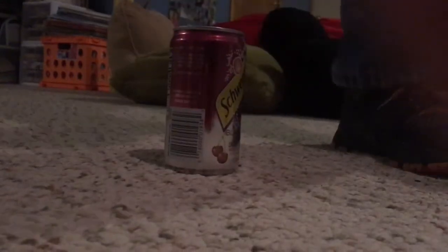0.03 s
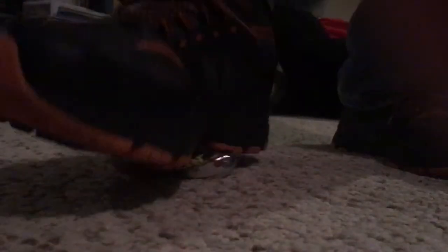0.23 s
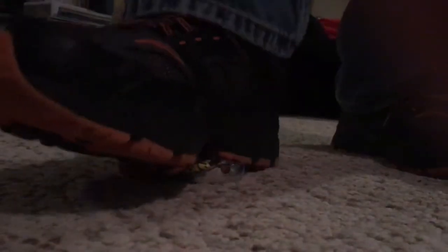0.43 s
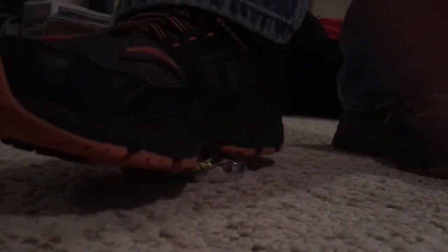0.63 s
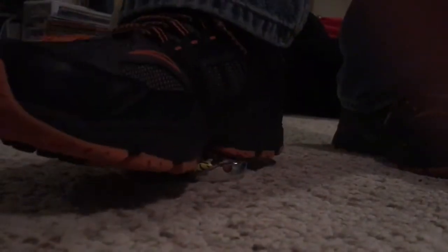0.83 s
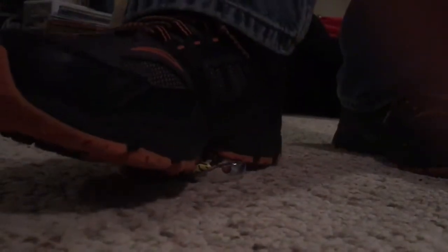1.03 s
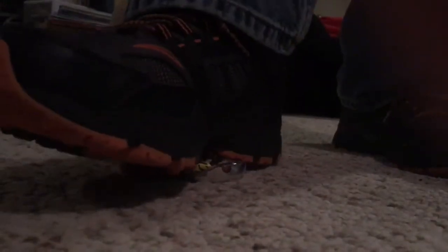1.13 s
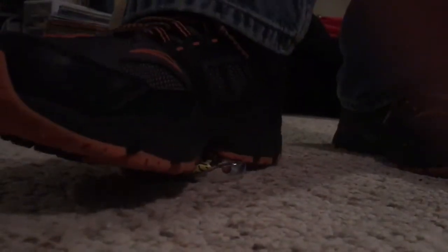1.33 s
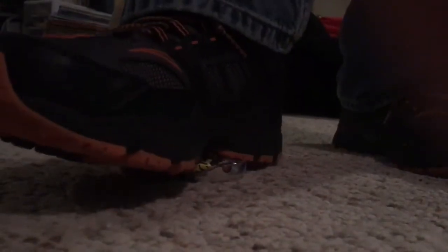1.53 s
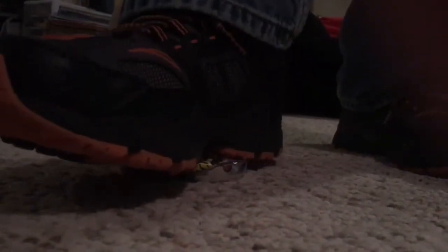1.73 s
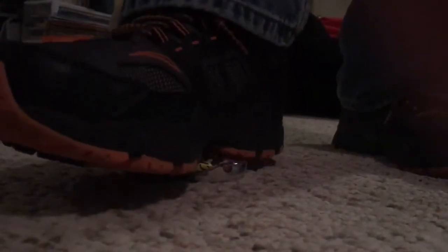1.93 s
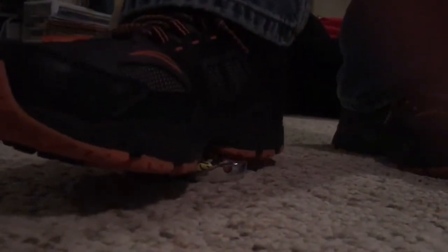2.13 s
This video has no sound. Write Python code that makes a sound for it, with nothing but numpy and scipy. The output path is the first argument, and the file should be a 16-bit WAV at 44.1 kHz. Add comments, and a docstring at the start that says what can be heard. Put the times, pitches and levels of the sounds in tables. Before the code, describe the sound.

An aluminium can stomped flat on carpet with one sharp crunch and a thud.

```python
"""An aluminium can is stomped flat on carpet, close by in a quiet room.
The shoe pushes air ahead of it; the wall ticks, gives way with a hollow pop and folds in a 40 ms
crunch of buckles and creases that rings the can. The heel thuds down and the room rings briefly.
Then the sole scuffs, the flat can creaks faintly and two soft blips sound over low hiss and hum."""
import sys
import numpy as np
from scipy import signal
from scipy.io import wavfile

SR = 44100
rng = np.random.default_rng(int(sys.argv[2]) if len(sys.argv) > 2 else 0)


def generate_wav(signal):
    """Clip the signal to [-1, 1] and save it as 16-bit WAV at the path in sys.argv[1]."""
    frames = np.transpose(np.atleast_2d(signal))
    scaled = np.clip(frames, -1, 1) * 32767
    pcm = np.round(scaled).astype(np.int16)
    wavfile.write(sys.argv[1], SR, pcm)


N = 97020

# background spectra: freq_hz, gain_db
HISS_SPECTRUM = [(20, 5.5), (100, -3), (250, -8), (600, -11.5), (1500, -14), (4000, -14.5), (5000, -15),
                 (5600, -61.5), (16000, -77)]
FIZZ_SPECTRUM = [(2000, -41), (4800, -10.5), (5700, 4.5), (8000, 1), (15500, 3), (16200, -22.5)]
RUMBLE_SPECTRUM = [(10, -22), (30, -6.5), (48, 6), (70, -9.5), (130, -22), (400, -41), (2000, -78.5)]
# background levels over time: time_s, level_db
HISS_ENVELOPE = [(0, -73.5), (.15, -67), (.42, -72), (.55, -72), (.97, -68.5), (1.02, -76), (1.69, -73.5),
                 (1.73, -65.5), (2.2, -67)]
FIZZ_ENVELOPE = [(0, -79.5), (.16, -71), (.42, -79.5), (.47, -74), (.75, -76.5), (.97, -70), (1.0, -80),
                 (1.16, -80), (1.19, -104), (2.2, -104)]
RUMBLE_ENVELOPE = [(0, -73.5), (.4, -80), (.75, -83.5), (.95, -74), (1.1, -71), (1.4, -72), (1.6, -79),
                   (1.75, -73), (2.2, -75)]
HUM_ENVELOPE = [(0, -69), (.7, -78), (.95, -65.5), (1.1, -64), (1.2, -80), (2.2, -80.5)]
# pushed air: time_s, level_db
RUSH_ENVELOPE = [(0, -92), (.12, -86), (.18, -66), (.2, -50), (.215, -40), (.235, -32), (.26, -40),
                 (.30, -51), (.35, -68.5), (.42, -96.5)]
# pushed air: freq_hz, gain_db
RUSH_SPECTRUM = [(20, -24), (55, 0), (100, -1.5), (180, 2.5), (400, -6), (900, -15), (2500, -36.5),
                 (8000, -61)]
# faint creaks, then the small ticks of the two low blips: start_s, pitch_hz, level_db, decay_s
CREAKS_AND_TICKS = [(.171, 1090, -56.5, 0.0034), (.494, 599, -58, 0.0059), (.503, 219.5, -52, 0.0044),
                    (.511, 1308, -62, .003), (.520, 150.1, -54.5, 0.0061), (.662, 515, -59.5, 0.0023),
                    (.689, 452.7, -61, 0.0034), (.760, 431, -50.5, .002), (.935, 237.8, -63, 0.011),
                    (.98, 170, -64.5, .01), (1.1172, 1000, -53.5, .0007), (1.1176, 2498, -56.5, .0005),
                    (1.3160, 399.5, -54, .002), (1.3172, 850, -56, .0015)]
# their grit: freq_hz, gain_db
GRIT_SPECTRUM = [(100, -2.5), (600, 6.5), (1500, -8.5), (4000, -28), (12000, -65)]
# big buckles: start_s, body_db, treble_db, decay_s
WALL_BUCKLES = [(.1925, -60, -56.5, 0.0013), (.2040, -34, -37.5, 0.0014), (0.2066, -43.5, -37, 0.0013),
                (0.2153, -6, -6, .0006), (.2220, -22, -22, 0.002), (.2277, -8, -12.5, 0.0012),
                (.2305, -19.5, -18.5, .0015), (.2385, -21.5, -23, .0015), (.2420, -16, -13.5, 0.0022),
                (0.2444, -17.5, -17, .001), (0.248, -16.5, -20.5, .0016), (.2562, -11.5, -24, 0.0011)]
# fine crumpling: time_s, body_db, treble_db
CRUMPLE_ENVELOPE = [(.19, -90.5, -100), (.206, -68, -54.5), (.214, -46.5, -55), (.217, -27, -32.5),
                    (.226, -24, -35), (.229, -22, -21), (.247, -22.5, -26), (.257, -22.5, -31),
                    (.263, -39, -47.5), (.29, -53, -56), (.32, -77.5, -74.5), (.365, -63.5, -68),
                    (.41, -94.5, -100)]
# folding metal: freq_hz, gain_db
BODY_SPECTRUM = [(60, -32), (250, -6.5), (450, 0), (700, 1), (1100, 0), (1600, -1), (2200, -4.5),
                 (2900, -2.5), (3800, -3), (4600, -14), (8000, -31.5), (16000, -47.5)]
TREBLE_SPECTRUM = [(500, -39), (3000, -13.5), (5200, -4.5), (6300, -0.5), (7700, -5), (9000, 4),
                   (10300, -0.5), (12000, 1.5), (15000, 4), (16500, -6.5)]
# can ringing: pitch_hz, gain_db, t60_s
CAN_MODES = [(400, 3, .11), (473, -4, .1), (573, -6, .09), (647, 2, .07), (842, -4, .08), (972, 1, .06),
             (1033, -2, .06), (1291, 1, .05), (1394, -3, .07), (1740, -4, .05), (2624, 2, .04),
             (2910, -2, .04), (3231, -1, .04), (3722, -2, .04)]
# wall flex, hollow pop, can on floor, rebounds: start_s, pitch_hz, gain_db, rise_s, decay_s
LOW_BLOWS = [(0.2122, 300, -27, .002, .004), (.2172, 279.8, -2.5, 0.00061, .0038),
             (.2163, 690.4, -5, .001, .0025), (.2255, 690, -14, .003, 0.0044),
             (0.2304, 200.2, -17, .001, .005), (0.2367, 172, -14, .001, 0.0071),
             (0.2376, 419.3, -16, .001, .004), (0.2557, 400, -21.5, .001, .004),
             (.282, 75, -36, .003, .014)]
# rim ringing: pitch_hz, level_db, t60_s
RIM_MODES = [(168, -49, .28), (403, -66, .8), (606, -70, 1.1), (925, -65, .7)]
# settling sole: time_s, level_db
SCUFF_ENVELOPE = [(.42, -100), (.48, -72.5), (.50, -58), (.515, -66), (.535, -74.5), (.6, -77.5),
                  (.66, -100)]
# settling sole: freq_hz, gain_db
SCUFF_SPECTRUM = [(40, -10), (120, 2), (400, 0), (900, -3.5), (1800, -12), (3000, -24), (12000, -36)]
# low sweeps: tick_s, length_s (negative: before the tick), level_db, knee_s
BLIP_SWEEPS = [(1.1174, 0.037, -54, 0.0048), (1.317, -0.12, -55.5, 0.015)]
# room decay: freq_hz, t60_s
ROOM_DECAY = [(60, 0.005), (250, 0.2354), (1000, 0.2043), (3000, 0.1843), (8000, 0.19), (16000, 0.11)]
# room tail: freq_hz, gain_db
ROOM_SPECTRUM = [(50, -8), (150, -1), (500, -2.5), (1400, -3.5), (3500, -6), (6000, 1.5), (9000, -1),
                 (15000, -2.5)]


def amp(db):
    """Decibels to gain."""
    return 10 ** (np.asarray(db) / 20)


def unit_rms(x):
    """Scale to rms 1."""
    return x / np.sqrt(np.mean(x ** 2) + 1e-20)


def at_freq(points, freq_hz):
    """Interpolate on a log-frequency axis."""
    knots_hz, values = np.transpose(points)
    return np.interp(np.log(freq_hz + 1), np.log(knots_hz + 1), values)


def envelope(points, column=1):
    """Gain over time from one dB column."""
    rows = np.array(points)
    return amp(np.interp(np.arange(N) / SR, rows[:, 0], rows[:, column]))


def since(start_s):
    """Seconds since start, zero before."""
    return np.maximum(np.arange(N) / SR - start_s, 0)


def colour(x, spectrum, size=4096):
    """Causal unit-energy filter with the given spectrum."""
    freq_hz = abs(np.fft.fftfreq(size, 1 / SR))
    log_gain = np.log(amp(at_freq(spectrum, freq_hz)))
    response = np.exp(np.conj(signal.hilbert(log_gain)))
    taps = np.fft.ifft(response).real[:size // 2]
    return signal.oaconvolve(x, taps / np.linalg.norm(taps))[:N]


def noise(spectrum):
    """Steady coloured noise, rms 1."""
    return unit_rms(colour(rng.standard_normal(N), spectrum))


def background(hum_hz=47.7):
    """Faint hiss, treble fizz, rumble and mains hum, each changing in level; the fizz stops near 1.19 s and the
    hiss rises near 1.7 s."""
    hiss = noise(HISS_SPECTRUM) * envelope(HISS_ENVELOPE)
    fizz = noise(FIZZ_SPECTRUM) * envelope(FIZZ_ENVELOPE)
    rumble = noise(RUMBLE_SPECTRUM) * envelope(RUMBLE_ENVELOPE)
    hum = np.sqrt(2) * envelope(HUM_ENVELOPE) * np.sin(2 * np.pi * hum_hz * since(0))
    return hiss + fizz + rumble + hum


def air_rush():
    """Air pushed ahead of the shoe: a swell of low noise."""
    return noise(RUSH_SPECTRUM) * envelope(RUSH_ENVELOPE)


def creaks_and_ticks():
    """Faint creaks, then the small ticks of the two low blips: damped swings with grit."""
    out = np.zeros(N)
    grit = .46 * noise(GRIT_SPECTRUM)
    for start_s, pitch_hz, level_db, decay_s in CREAKS_AND_TICKS:
        t = since(start_s)
        fade = (t > 0) * np.exp(-t / decay_s)
        out += amp(level_db) * fade * (np.sin(2 * np.pi * pitch_hz * t) + grit)
    return out


def creases(rate_per_s=2200, spread_db=5):
    """Dense train of tiny uneven snaps."""
    sizes = amp(spread_db * np.minimum(rng.exponential(1, N), 3))
    signs = rng.choice([-1., 1.], N)
    hits = rng.random(N) < rate_per_s / SR
    return unit_rms(sizes * signs * hits)


def folding_wall(spectrum, column, click_share):
    """One register of the metal: fine creases plus buckles, each a click and a noise burst."""
    drive = envelope(CRUMPLE_ENVELOPE, column) * creases()
    scatter = rng.choice([-1., 1.], N)
    for buckle in WALL_BUCKLES:
        start_s, gain, decay_s = buckle[0], amp(buckle[column]), buckle[-1]
        t = since(start_s)
        burst = (t > 0) * np.exp(-t / decay_s) * scatter
        drive += gain * np.sqrt(1 - click_share) * burst
        drive[round(start_s * SR)] += gain * np.sqrt(click_share * decay_s * SR / 2)
    return colour(drive, spectrum)


def can_crunch(ring_vs_body_db=-7):
    """The wall folds; the can's modes build up with its energy, then die away."""
    body = folding_wall(BODY_SPECTRUM, column=1, click_share=.4)
    t = np.arange(SR // 2) / SR
    ring = np.zeros(N)
    for pitch_hz, gain_db, t60_s in CAN_MODES:
        energy = signal.oaconvolve(body ** 2, amp(-120 * t / t60_s))[:N]
        tone = np.sin(2 * np.pi * (pitch_hz * since(0) + rng.random()))
        ring += amp(gain_db) * np.sqrt(abs(energy)) * tone
    treble = folding_wall(TREBLE_SPECTRUM, column=2, click_share=.14)
    return body + amp(ring_vs_body_db) * body.std() * unit_rms(ring) + treble


def low_blows():
    """Heavily damped swings of air, can and floor."""
    out = np.zeros(N)
    for start_s, pitch_hz, gain_db, rise_s, decay_s in LOW_BLOWS:
        t = since(start_s)
        swell = (1 - np.exp(-t / rise_s)) * np.exp(-t / decay_s)
        out += amp(gain_db) * swell * np.sin(2 * np.pi * pitch_hz * t)
    return 1.1 * out


def heel_thud(start_s=.2305, level_db=-8.5, rise_s=.0029, decay_s=.013):
    """Deep falling thud: the floor's swing slows as the weight settles."""
    start_hz, end_hz, sag_s = 109, 48, .01
    t = since(start_s)
    cycles = end_hz * t + (start_hz - end_hz) * sag_s * (1 - np.exp(-t / sag_s))
    swell = (1 - np.exp(-t / rise_s)) * np.exp(-t / decay_s)
    return -amp(level_db) * swell * np.sin(2 * np.pi * cycles)


def rim_ring(start_s=.256):
    """The stiff rim rings on faintly once the can is flat."""
    t = since(start_s)
    return sum(amp(level_db - 60 * t / t60_s) * np.sin(2 * np.pi * pitch_hz * t)
               for pitch_hz, level_db, t60_s in RIM_MODES)


def scuff():
    """Dull rub of sole and flat can on carpet."""
    return envelope(SCUFF_ENVELOPE) * unit_rms(colour(creases(), SCUFF_SPECTRUM))


def blips(edge_s=.002):
    """Two soft low sweeps: one falls away from a tick, one rises into a tick."""
    out = np.zeros(N)
    for tick_s, length_s, level_db, knee_s in BLIP_SWEEPS:
        distance_s = np.maximum((np.arange(N) / SR - tick_s) * np.sign(length_s), 0)
        swell = (1 - np.exp(-distance_s / edge_s)) * np.exp(-(distance_s / length_s) ** 4)
        cycles = 1.465 * np.log1p(distance_s / knee_s)
        out += amp(level_db) * swell * np.sin(2 * np.pi * cycles)
    return out


def room(x, level_db=-19, build_s=.0076, size=256):
    """Short diffuse tail of a carpeted room; each band decays at its own rate."""
    freq_hz, t, bands = signal.stft(rng.standard_normal(SR // 2), SR, nperseg=size)
    fade_db = -60 * t / at_freq(ROOM_DECAY, freq_hz)[:, None]
    colour_db = at_freq(ROOM_SPECTRUM, freq_hz)[:, None]
    tail = signal.istft(bands * amp(fade_db + colour_db), SR, nperseg=size)[1]
    tail *= np.minimum(np.arange(len(tail)) / SR / build_s, 1) ** 2
    return amp(level_db) * signal.fftconvolve(x, tail / np.linalg.norm(tail))[:N]


def scene():
    """Stomp and aftermath in the room, plus blips and background; mono."""
    stomp = can_crunch() + rim_ring() + heel_thud() + low_blows()
    direct = stomp + creaks_and_ticks() + air_rush() + scuff()
    return (direct + room(direct) + blips() + background())[None]


def record(dry):
    """Microphone: low cut, soft peak rounding, band limit."""
    low_cut_hz, high_cut_hz, ceiling = 15, 16100, .62
    thinned = signal.lfilter(*signal.butter(2, low_cut_hz, "high", fs=SR), dry)
    rounded = ceiling * np.tanh(thinned / ceiling)
    lowpass = signal.firwin(255, high_cut_hz, window=("kaiser", 9), fs=SR)
    return signal.oaconvolve(rounded, lowpass[None], "same")


dry = scene()
out = record(dry)
generate_wav(out)
```